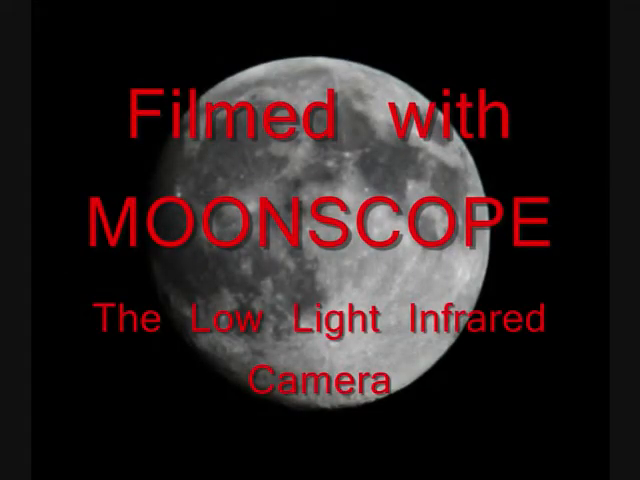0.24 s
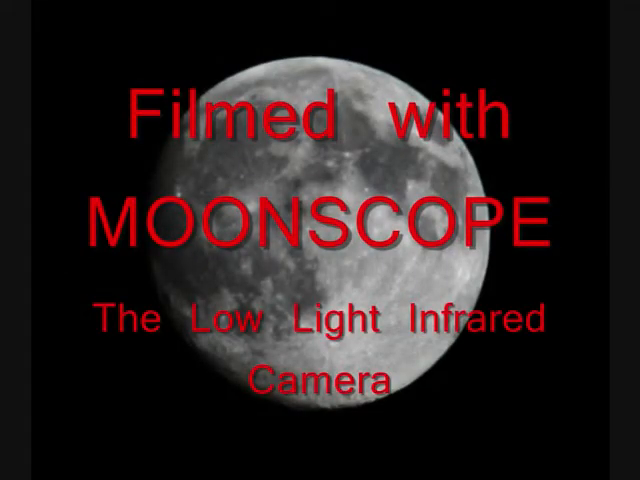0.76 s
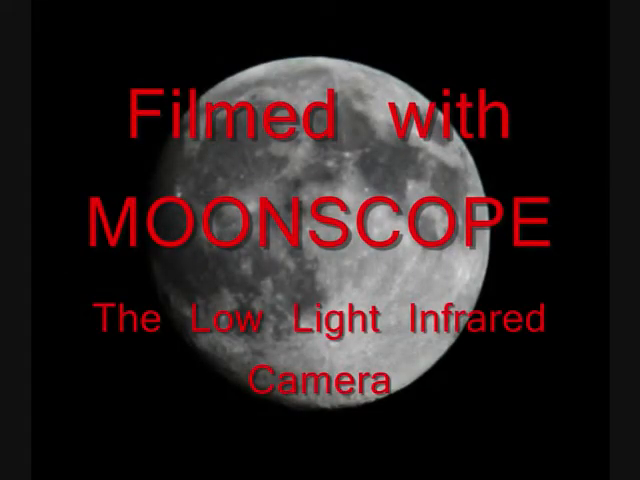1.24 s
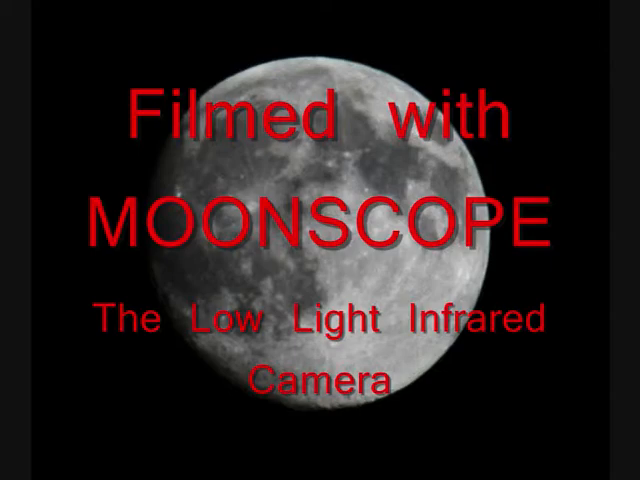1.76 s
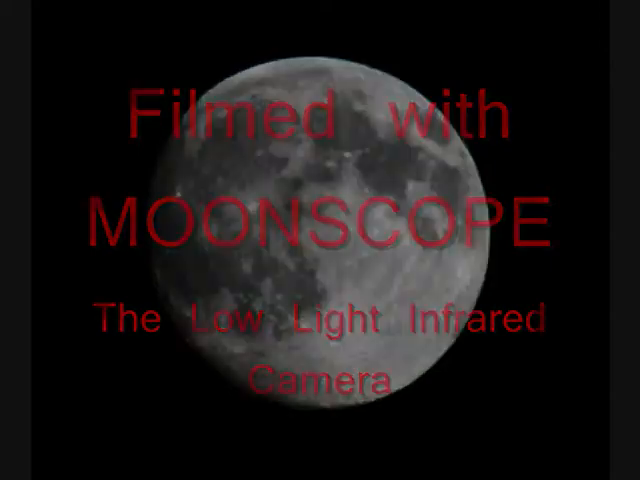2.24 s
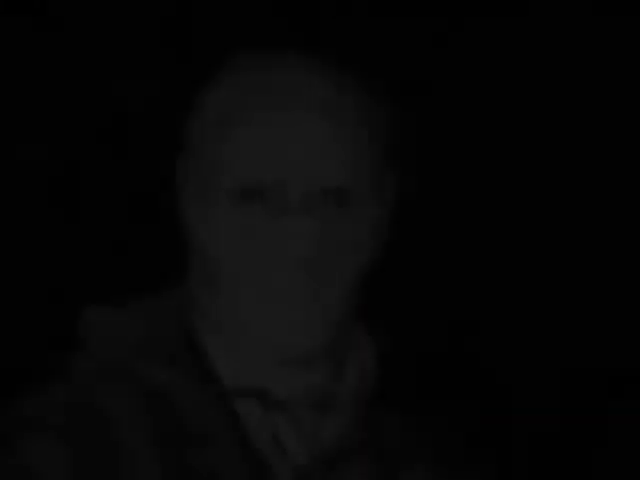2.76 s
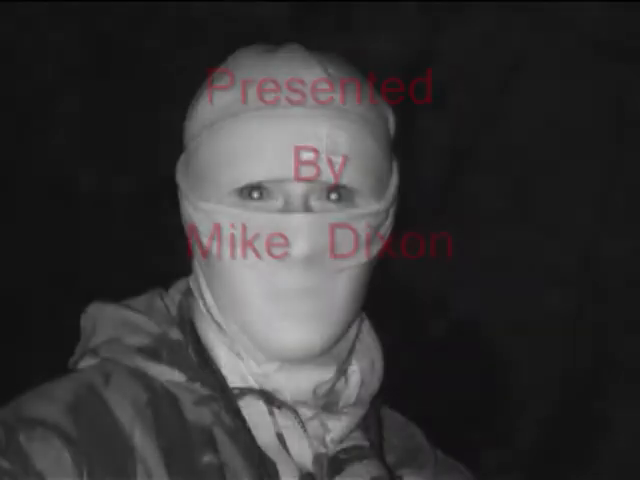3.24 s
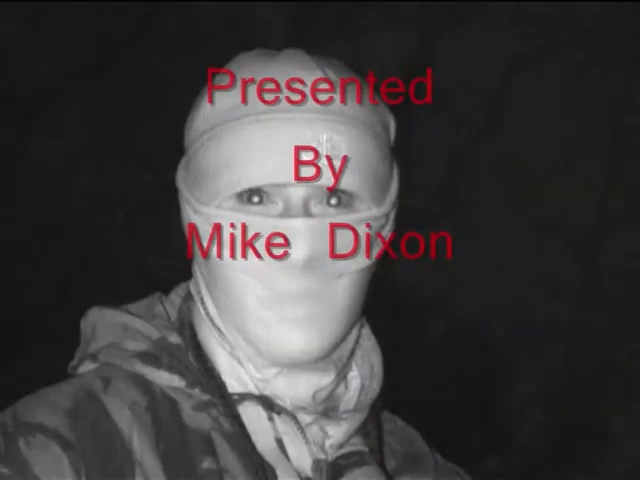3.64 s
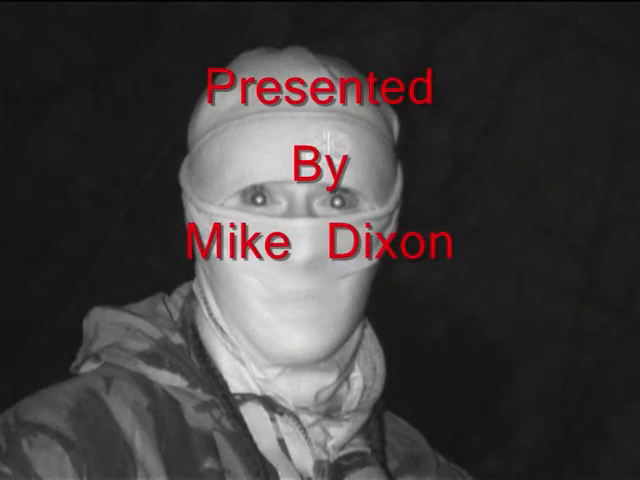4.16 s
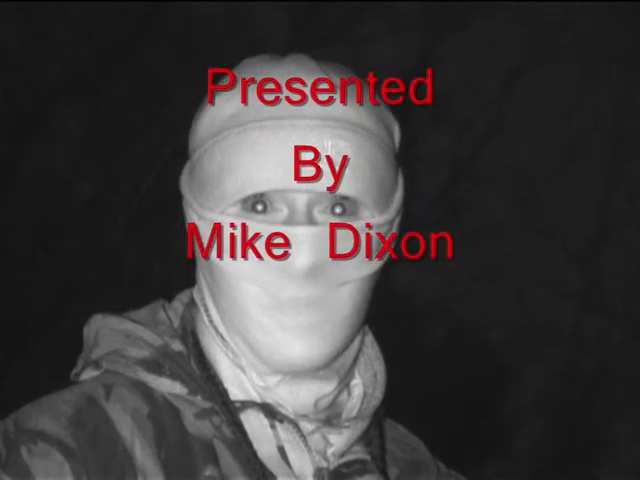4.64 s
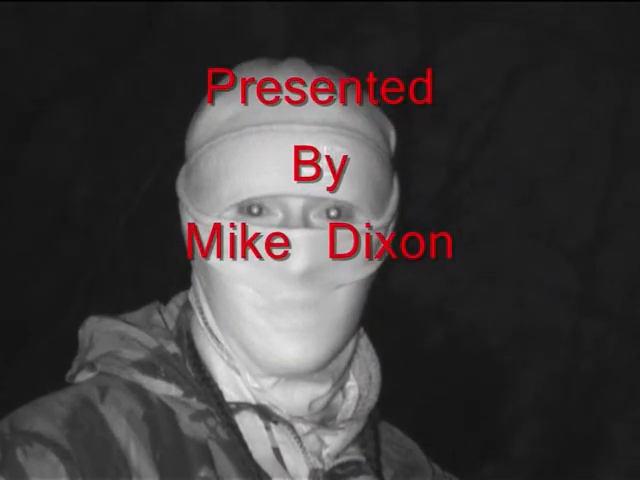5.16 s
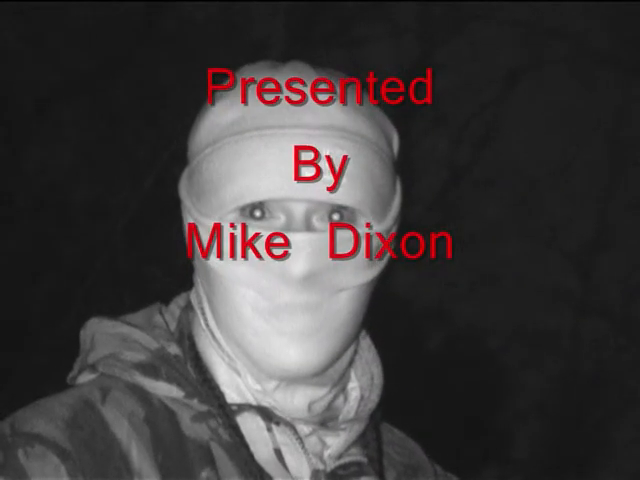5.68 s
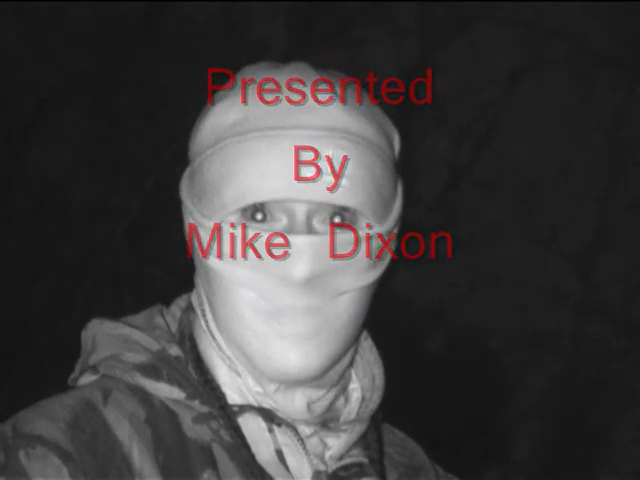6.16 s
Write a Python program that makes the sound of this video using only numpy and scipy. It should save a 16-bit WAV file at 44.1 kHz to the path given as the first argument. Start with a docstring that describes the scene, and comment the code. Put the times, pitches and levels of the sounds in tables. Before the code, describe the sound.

A quiet wood at night is heard through stereo microphones, with a low far-off rumble and soft air hiss throughout. At about 0.3 seconds an owl close on the right gives a short two-part shriek: a soft wavering whistle that breaks upward into a loud, bright, arching cry, ringing briefly among the trees. From about 1 second until nearly 5 seconds come a few very faint, brief rustles. Near 2.8 seconds a distant owl on the left gives one softer, lower hoot, about a second long. Its almost pure, slightly quavering tone scoops up, holds, then falls and fades, smeared by the trees, with a faint echo returning around 4 seconds. At 5 seconds the near owl shrieks again, a little louder and higher. Its ring dies away, leaving the night air until the end, just past 6 seconds.

```python
"""A wood at night, on a stereo pair of microphones. A low far-off rumble and soft air hiss run throughout.
At 0.3 s a tawny owl, close on the right, shrieks "ke-wick": its syrinx sounds a soft wavering whistle
that breaks upward into a loud, bright arch. From 1 s on come a few faint rustles. Near 2.8 s a distant
owl on the left gives one falling hoot, smeared by the trees and returned by the far edge of the wood.
At 5 s the near owl shrieks again."""
import sys
import numpy as np
from scipy import signal
from scipy.fft import rfft, irfft
from scipy.io import wavfile
from scipy.ndimage import uniform_filter1d

SR = 44100
rng = np.random.default_rng(int(sys.argv[2]) if len(sys.argv) > 2 else 0)


def digitize_waveform(pressure):
    """Quantize a signal to 16-bit integers and store it at the path in sys.argv[1].

    Rows of a 2-D input are taken as channels; values are limited to [-1, 1].
    """
    field = np.atleast_2d(pressure).T
    bounded = np.clip(field, -1, 1)
    quanta = np.round(bounded * 32767).astype(np.int16)
    wavfile.write(sys.argv[1], SR, quanta)


N = 282795
TIME = np.arange(N) / SR
FREQS = np.arange(N // 2 + 1) * SR / N


def undb(db):
    """Decibels to gain."""
    return 10 ** (np.asarray(db) / 20)


def unit(x):
    """Scale to rms 1."""
    return x / np.sqrt(np.mean(x ** 2))


def spectrum(points, hz):
    """Read (Hz, dB) points on a log-frequency axis."""
    point_hz, db = np.transpose(points)
    return np.interp(np.log(hz + 1), np.log(point_hz), db)


def noise(gain):
    """White noise coloured by a gain per frequency."""
    return irfft(rfft(rng.standard_normal(N)) * gain, N)


def band(hz, octaves):
    """A bell-shaped gain per frequency."""
    return np.exp(-.5 * (np.log2((FREQS + 1) / hz) / octaves) ** 2)


def walk(rate_hz):
    """Smooth random motion of spread 1, up to about rate_hz."""
    return unit(noise(np.exp(-.5 * (FREQS / rate_hz) ** 2)))


def delay(x, seconds):
    """The sound arriving later."""
    return np.interp(TIME - seconds, TIME, x, left=0)


def ramp(start, end):
    """Rises from 0 to 1 between two times."""
    return np.clip((TIME - start) / max(end - start, 1 / SR), 0, 1)


def surge(middle, width_s):
    """A smooth step from 0 to 1 around a time."""
    return .5 + .5 * np.tanh((TIME - middle) / width_s)


def soft_gate(start, end, edge_samples=100):
    """A gate with soft edges, open between two times."""
    return uniform_filter1d(1. * ((TIME > start) & (TIME < end)), size=edge_samples)


# The night air all around the microphones. Each row: frequency in Hz, relative level in dB.
AIR_COLOUR = [(12, -35), (20, -23), (46, -0.5), (65, 0), (141, -7.5), (177, -14), (227, -17.5), (292, -22),
              (345, -20), (456, -22), (620, -19), (675, -17.5), (1700, -21.5), (7880, -40.5), (15800, -38)]
# Its width across the pair. Each row: frequency in Hz, side minus mid in dB.
AIR_WIDTH = [(30, -26), (65, -11), (130, -0.5), (300, -0.5), (2000, -0.5), (12000, -2)]
def night_air(level_db=-61, rumble_sway_db=1.0, hiss_sway_db=0.93):
    """Far-off rumble, alike at both microphones, under a wide hiss; both sway a little."""
    colour = undb(spectrum(AIR_COLOUR, FREQS))
    width = undb(spectrum(AIR_WIDTH, FREQS))
    low = 1 / (1 + (FREQS / 250) ** 2)
    mid, side = 0, 0
    for share, sway_db in ((low, rumble_sway_db * walk(5.3)), (1 - low, hiss_sway_db * walk(9.31))):
        mid += undb(sway_db) * noise(colour * np.sqrt(share))
        side += undb(sway_db) * noise(colour * np.sqrt(share) * width)
    return undb(level_db) * np.array([mid + side, mid - side]) / np.std(mid)


def kewick(start, breaks, top, end, whistle_hz, top_hz, whistle_db, arch_db, swell_db, arch_soft_db):
    """Pitch, level, softness and gate of one call: a sagging whistle, then a hard-pushed arch."""
    # "ke": the whistle scoops up, sags to its pitch halfway and climbs back to the break
    crest = start + 0.015
    lift = np.abs(2 * ramp(crest, breaks) - 1) ** 1.18
    ke_hz = whistle_hz * (1 + .121 * lift - .095 * (1 - ramp(start, crest)))
    ke_db = whistle_db + 2.2 * ramp(start, breaks)
    ke_soft_db = 3.2 + 5.5 * (1 - lift)
    # "wick": the voice jumps up, arches over, sinks back and collapses
    jump_hz, sunk_hz, end_hz = 1.305 * whistle_hz, 1.18 * whistle_hz, 0.88 * whistle_hz
    sunk = end - .026
    climb_left = (1 - ramp(breaks, top)) ** 2.686
    sink = ramp(top, sunk) ** .9
    collapse = ramp(sunk, end)
    below_top_hz = ((top_hz - jump_hz) * climb_left + (top_hz - sunk_hz) * sink
                    + (sunk_hz - end_hz) * collapse)
    wick_db = arch_db + swell_db * np.exp(-np.abs(below_top_hz) / 75) - 2.5 * sink - 12.5 * collapse
    jump = surge(breaks, width_s=0.0071)
    hz = (1 - jump) * ke_hz + jump * (top_hz - below_top_hz)
    # the push of air surges just before the break
    push = surge(breaks - .023, width_s=0.023)
    db = (1 - push) * ke_db + push * wick_db
    softness = (1 - push) * ke_soft_db + push * arch_soft_db + 18 * collapse
    return uniform_filter1d(hz, size=180), db, softness, soft_gate(start, end, edge_samples=180)


# The near owl's throat and open beak. Each row: frequency in Hz, gain in dB.
THROAT_RESPONSE = [(1000, -10), (1500, -4.5), (1900, -7), (2300, -5), (3100, 0), (3700, -2.5), (4600, -7),
                   (5300, -21), (6000, -19), (6600, -27), (8000, -31.5), (10000, -45), (14000, -41)]
def shriek(call, jitter=0.00297, shimmer_db=0.7, flutter_db=0.5, rasp_db=-25, rasp_hz=6500, harmonics=7):
    """The syrinx sounds harmonics through the throat; pressing harder makes it brighter and raspier."""
    hz, db, softness, gate = kewick(*call)
    phase = 2 * np.pi * np.cumsum(hz * (1 + jitter * walk(270))) / SR
    # the membranes close unevenly: the upper harmonics shake together, and each also flutters alone
    shared_slope_db = softness + shimmer_db * walk(130)
    voice = np.zeros(N)
    for k in range(1, harmonics + 1):
        loss_db = (shared_slope_db + flutter_db * walk(105)) * np.log2(k)
        voice += undb(spectrum(THROAT_RESPONSE, k * hz) - loss_db) * np.sin(k * phase)
    # air rushes through the beak once a cycle, only half coloured by the throat
    breath = unit(noise(undb(spectrum(THROAT_RESPONSE, FREQS) / 2) * band(rasp_hz, 0.8)))
    rasp = breath * (1 + .5 * np.sin(phase))
    return gate * undb(db) * (voice + undb(rasp_db - softness) * rasp)


# The owl close to the microphones. Each row: start, break, top of the climb and end in seconds,
# whistle and top pitch in Hz, whistle and arch level before the throat in dB, swell at the top in dB,
# arch softness in dB lost per octave of harmonics (negative is brighter).
NEAR_CALLS = [(.322, .484, .529, 0.6116, 1104, 1533, -45, -38.8, 0.7, -6.5),
              (5.007, 5.1571, 5.234, 5.301, 1117, 1630, -43.7, -36.9, 6, -5.1)]
# It sits to the right of the pair. Each row: frequency in Hz, left minus right in dB.
NEAR_PAN = [(1300, -7.5), (3000, -7), (5000, -1)]
def near_owl(bounce=0.9088, bounce_top_hz=3300, trunk_db=-15, branch_db=-11.3, wood_db=-24):
    """Close up: direct sound plus a dull ground bounce that notches the harmonics; then the trees ring."""
    voice = sum(shriek(call) for call in NEAR_CALLS)
    voice_bins = rfft(voice)
    pan_db = spectrum(NEAR_PAN, FREQS)
    ground = bounce / (1 + (FREQS / bounce_top_hz) ** 4)
    left_bounce_s, right_bounce_s, right_mic_lag_s = 0.0027161, 0.00268, .000018
    turn = -2j * np.pi * FREQS
    left = undb(pan_db / 2) * (1 + ground * np.exp(turn * left_bounce_s))
    right = undb(-pan_db / 2) * (1 + ground * np.exp(turn * right_bounce_s))
    direct = irfft(voice_bins * np.array([left, right * np.exp(turn * right_mic_lag_s)]), N)
    # twigs and leaves throw back short waves best: 2 dB more per octave
    leaf_tilt_db = 2.0 * np.log2(np.clip(FREQS, 1000, 9000) / 3000)
    bright = irfft(voice_bins * undb(leaf_tilt_db), N)
    branches = trees(bright, t60=0.46, treble_t60=0.32, build_s=0.02038, grain=0.35)
    wood = trees(voice, t60=1.94, treble_t60=0.81, build_s=0.078, grain=0.74)
    return direct + undb(trunk_db) * trunks(bright) + undb(branch_db) * branches + undb(wood_db) * wood


def trunks(x, first_s=.006, last_s=.05, count=9):
    """Nearby trunks send each microphone a few early echoes, which beat against the gliding pitch."""
    lags = rng.uniform(first_s, last_s, (2, count))
    return np.array([sum(np.roll(x, int(lag * SR)) for lag in mic) for mic in lags]) / np.sqrt(count)


def trees(x, t60, treble_t60, build_s, grain):
    """Trunks and leaves scatter uneven echoes to each microphone; they build and fade, treble first."""
    treble = np.clip(np.log2((FREQS + 1) / 1500) / 2, 0, 1)
    out = []
    for mic in range(2):
        echoes = rfft(rng.standard_normal(N) * np.exp(grain * rng.standard_normal(N)))
        tail = sum(irfft(echoes * share, N) * np.exp(-np.log(1000) * TIME / decay_s)
                   for share, decay_s in ((1 - treble, t60), (treble, treble_t60)))
        tail *= 1 - np.exp(-(TIME / build_s) ** 2)
        out.append(signal.fftconvolve(x, tail / np.sqrt(np.sum(tail ** 2)))[:N])
    return np.array(out)


# Faint rustles around the pair. Each row: peak time and length in seconds, centre in Hz, peak level in dB.
FAINT_RUSTLES = [(0.999, 0.07005, 1420, -63), (1.77, 0.086, 5520, -80), (1.913, 0.056, 2800, -69),
                 (2.126, 0.065, 1780, -71), (2.307, 0.17, 7050, -82), (2.68, 0.097, 1351, -67.5),
                 (2.707, 0.18, 5840, -77.5), (3.18, 0.073, 3600, -73.5), (3.381, .04, 1190, -67),
                 (3.67, 0.0678, 1500, -65.5), (3.843, 0.21, 6100, -79.5), (4.811, .07, 2033, -69.5)]
def rustles(octaves=0.2):
    """Brief soft brushes of noise, equally loud at both microphones."""
    out = np.zeros((2, N))
    for peak_s, length_s, hz, db in FAINT_RUSTLES:
        swell = undb(db) * np.exp(-2 * ((TIME - peak_s) / length_s) ** 2)
        out += swell * np.array([unit(noise(band(hz, octaves))) for mic in range(2)])
    return out


def hoot(start_s=2.76, length_s=.96, held_hz=878, level_db=-48.5, waver=0.0035):
    """An almost pure, slightly quavering tone that scoops up, holds its pitch, then falls and fades."""
    scoop_hz, fall_hz_per_s, fade_db_per_s = 115, 410, 67
    attack_s, scoop_s, fall_after_s, fade_after_s = .11, .19, .42, .67
    age = TIME - start_s
    scoop = (1 - ramp(start_s, start_s + scoop_s)) ** 2
    hz = held_hz - scoop_hz * scoop - fall_hz_per_s * np.clip(age - fall_after_s, 0, length_s)
    db = level_db - fade_db_per_s * np.maximum(age - fade_after_s, 0)
    gain = undb(db) * ramp(start_s, start_s + attack_s) * soft_gate(start_s, start_s + length_s)
    phase = 2 * np.pi * np.cumsum(hz * (1 + waver * walk(24.2))) / SR
    return gain * np.sqrt(2) * np.sin(phase)


def far_owl(right_mic_lag_s=0.00065, direct_db=-6, scatter_db=-4, wood_db=-7):
    """Far off to the left: a hoot heard mostly as scatter, with a late echo from the edge of the wood."""
    voice = hoot()
    direct = undb(direct_db) * np.array([voice, delay(voice, right_mic_lag_s)])
    slope_echo = undb(-8) * delay(voice, seconds=0.1)  # off a slope ahead; beats against the direct sound
    edge_echo = undb(-17) * delay(voice, seconds=1.2)
    scatter = trees(voice + edge_echo, t60=0.92, treble_t60=0.82, build_s=0.036, grain=0.5)
    wood = trees(voice, t60=3.8693, treble_t60=0.88, build_s=0.075, grain=0.6191)
    return direct + slope_echo + undb(scatter_db) * scatter + undb(wood_db) * wood


def scene():
    """Both owls in the quiet wood, as they reach the pair."""
    return near_owl() + far_owl() + rustles() + night_air()


def record(dry):
    """The recorder cuts steeply above 15.8 kHz."""
    return signal.sosfilt(signal.ellip(10, .1, 70, 15800, fs=SR, output="sos"), dry)


dry = scene()
out = record(dry)
digitize_waveform(out)
```